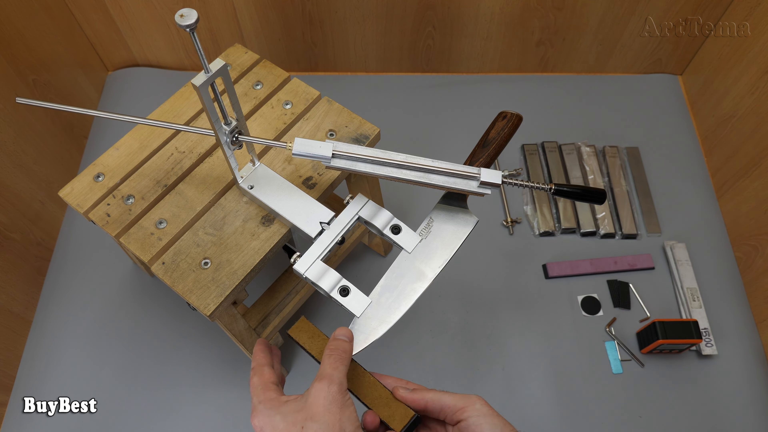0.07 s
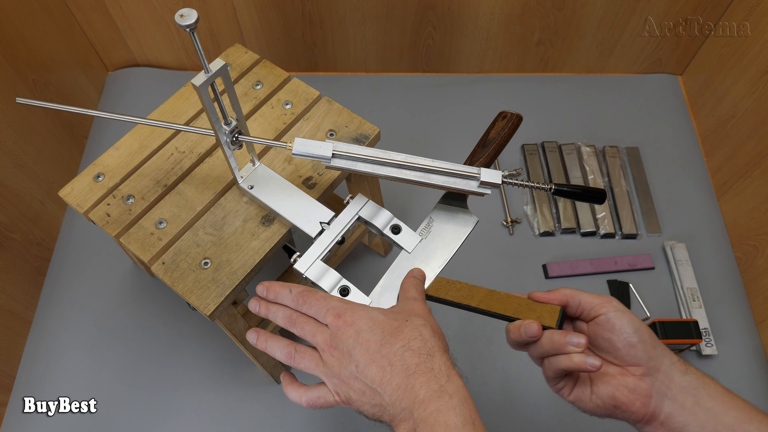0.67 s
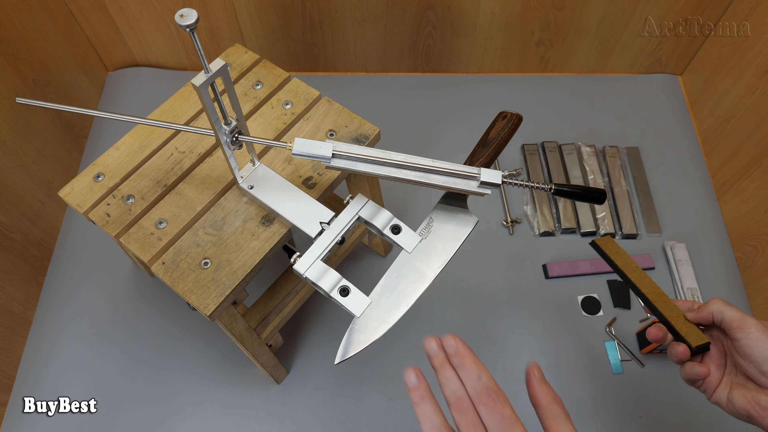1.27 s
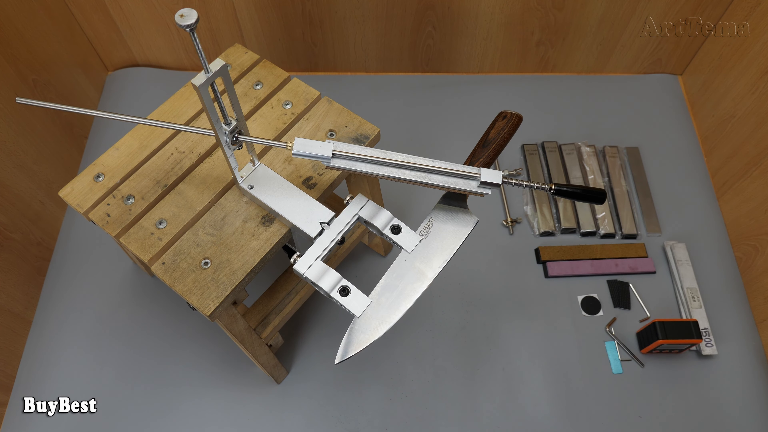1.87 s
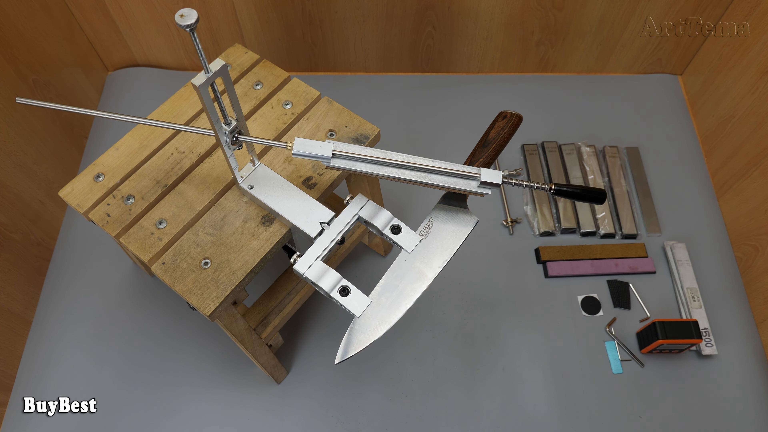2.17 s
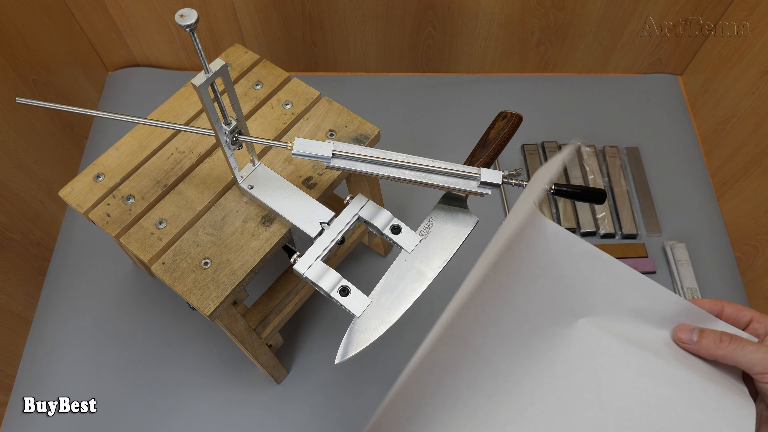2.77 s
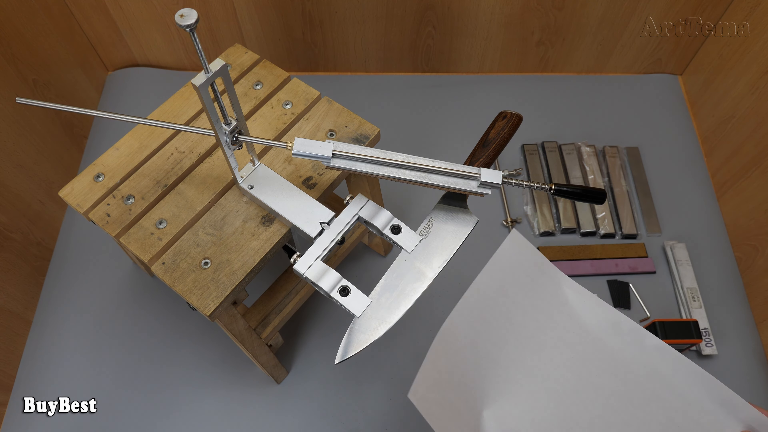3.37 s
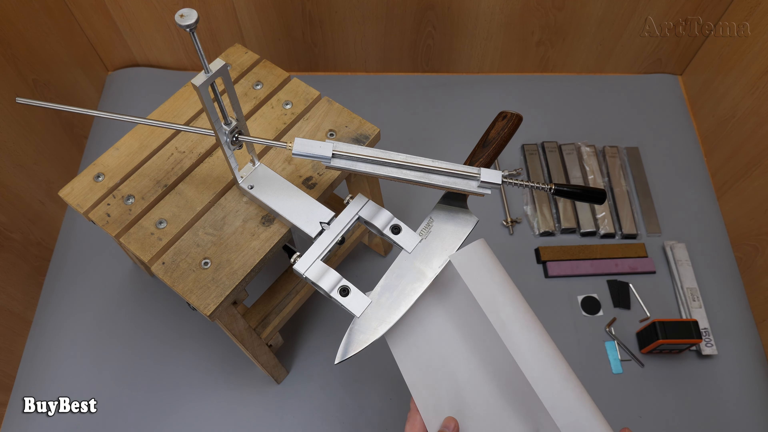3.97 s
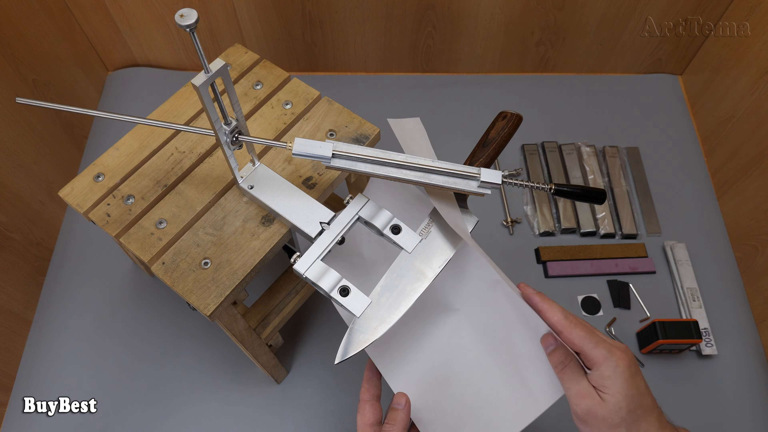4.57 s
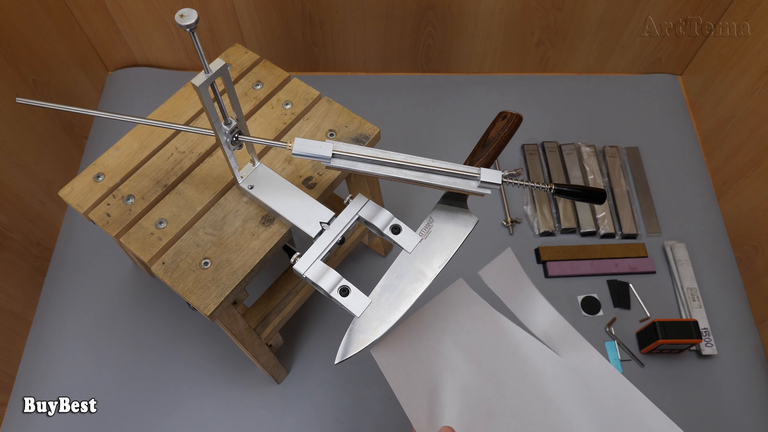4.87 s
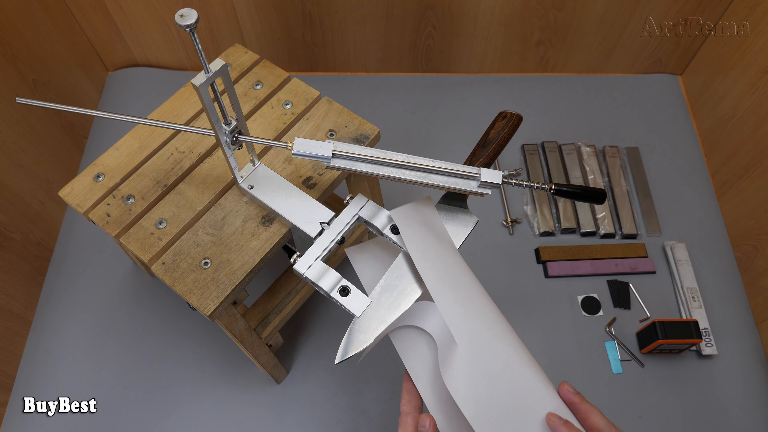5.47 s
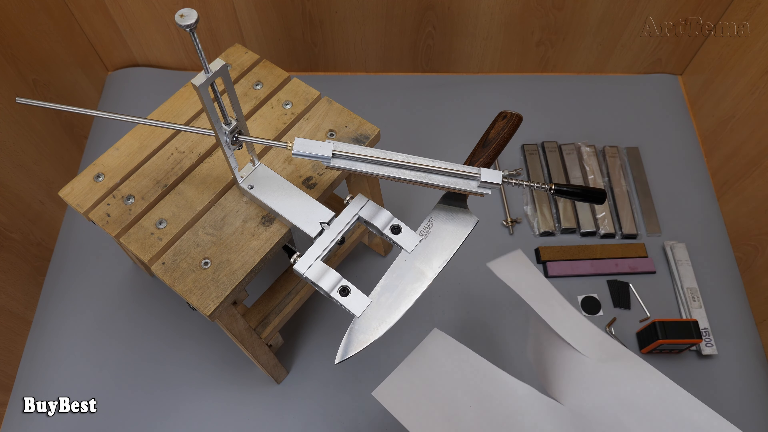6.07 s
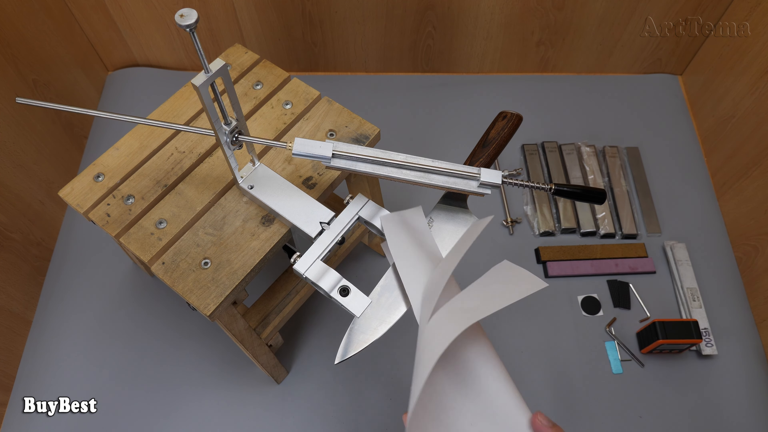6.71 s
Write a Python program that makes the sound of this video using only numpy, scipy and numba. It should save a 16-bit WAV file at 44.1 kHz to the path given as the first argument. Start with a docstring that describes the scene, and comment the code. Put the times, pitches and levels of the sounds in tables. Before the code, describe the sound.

From the start until about 1.3 seconds, a fine stone is flicked along a clamped knife nine times, slightly quickening. Each stroke is a soft, low thump through a wooden stool with a faint whisper of grit. At about 1.5 seconds the stone is put down with a sharp clack and briefly settles. From 2 seconds a sheet of paper rustles, slides and pops as it bends, with the sharpest crackles near 3 seconds. At about 4.1 seconds the blade slices the paper for half a second, a crisp, fizzing rasp with a slight steel ring and soft low bumps. More rustling leads to a shorter cut at 5.4 seconds, with a tiny squeak as the edge catches. The sheet crinkles again, and a third, brighter cut runs from 6.6 to 6.9 seconds. Everything is close, in a small, quiet room with faint low background noise.

```python
"""Soft thumps and a whisper of grit come first: a fine stone is flicked along a knife clamped in a
sharpening jig on a wooden stool. The stone clacks down on the table. A sheet of paper is picked up,
rustles and pops as it bends, and is drawn three times through the edge. Each cut is a stream of
snapping fibres that rings the sheet and the blade. It all happens close by, in a small, quiet room."""
import sys
import numpy as np
from scipy import signal
from scipy.fft import rfft, irfft
from scipy.io import wavfile
from numba import njit

SR = 44100
rng = np.random.default_rng(int(sys.argv[2]) if len(sys.argv) > 2 else 0)


def wav_record(signal):
    """Record a signal, one row per channel, as 16-bit PCM in the file named by sys.argv[1]."""
    frames = np.transpose(np.atleast_2d(signal))
    bounded = np.clip(frames, -1, 1)
    # unit amplitude maps onto the largest positive 16-bit level
    quanta = np.round(bounded * 32767).astype(np.int16)
    wavfile.write(sys.argv[1], SR, quanta)


N = 297231
T = np.arange(N) / SR

# Levels in the tables are relative: the functions add each layer's own gain.
# cuts: t/s, length/s, time to bite fully/s, time taut/s, sheet/dB, flap/dB, fizz/dB, slack flap f/Hz
CUTS = [(4.138, .49, 0.1, .09, -36.5, -30, -32, 4600), (5.385, 0.34, 0.041, .04, -36, -28, -30.5, 4700),
        (6.629, .3, 0.038, .04, -37, -22.5, -25.5, 4970)]
# the edge catches the paper and a note sings: t/s, length/s, f/Hz, level/dB
CATCHES = [(4.262, 0.2, 2920, -41), (5.417, 0.12, 1916, -43), (5.428, 0.07, 1948, -36.5),
           (6.627, 0.052, 1580, -36.5)]
# low thumps: a puff of air from the flapping sheet, then the cuts tugging the blade: t/s, level/dB
LOW_THUMPS = [(3.013, -47), (4.387, -42), (4.465, -43), (4.592, -43.5), (5.698, -42)]
# the stone meets the blade and slides off: t/s, thump level/dB, slide length/s, slide level/dB
STROKES = [ (0.0, -38, 0.042, -83), (0.157, -36.5, .1, -75.5), (0.339, -31, 0.077, -74),
           (0.505, -35, .07, -73), (0.667, -34.5, .055, -73), (0.816, -35.5, 0.047, -71),
           (0.963, -39, 0.047, -69.5), (1.091, -29.5, .06, -70.5), (1.221, -40, .033, -67)]
# the stone is put down and rocks to rest: t/s, length/s, knock/dB, click/dB, table thud/dB
CLACKS = [(1.394, 0.0016, -81, -59.5, -81), (1.452, 0.0038, -40, -53, -42), (1.483, 0.007, -59, -61, -40),
          (1.5293, 0.0043, -27.5, -27, -30), (1.569, 0.0055, -51, -68, -48.5),
          (1.575, 0.0064, -57, -59.5, -45.5), (1.621, 0.015, -59, -62, -71)]
# a patch of the sheet pops over: t/s, length/s, level/dB, f/Hz
BUCKLES = [(2.165, 0.015, -42, 2950), (2.224, 0.019, -44, 2430), (2.437, 0.039, -48, 1030),
           (2.504, 0.01, -41, 2900), (2.679, 0.017, -49, 1750), (2.701, 0.0042, -45, 2830),
           (2.744, 0.0045, -65, 3700), (2.762, 0.0075, -69.5, 3730), (2.806, 0.0067, -60, 1500),
           (2.994, 0.012, -36.5, 2150), (3.017, 0.0074, -34.5, 2200), (3.031, 0.0067, -32.5, 3020),
           (3.039, 0.012, -33.5, 2470), (3.205, 0.0045, -44.5, 1580), (3.271, 0.0027, -41.5, 2640),
           (3.399, 0.0027, -50.5, 1390), (3.568, 0.017, -47.5, 1790), (3.805, 0.0096, -50.5, 2700),
           (3.884, 0.016, -58, 1390), (3.973, 0.0059, -55.5, 1440), (4.066, 0.0055, -54, 1470),
           (4.78, 0.019, -41, 2640), (4.869, 0.0057, -45.5, 1720), (5.136, 0.0068, -44, 1530),
           (5.256, 0.0033, -47.5, 970), (5.306, 0.0096, -52.5, 1240), (5.819, 0.0034, -44, 2000),
           (5.931, 0.0086, -40, 2100), (5.949, 0.0075, -33.5, 2530), (6.108, 0.0076, -46.5, 1590),
           (6.292, 0.014, -49.5, 2100)]
# four moves of the sheet in the hands: t/s, flexing level/dB, sliding level/dB
PICK_UP = [(1.94, -74.5, -71), (1.98, -64, -56), (2.03, -79, -60.5), (2.11, -60, -55.5),
           (2.205, -59.5, -56), (2.3, -54.5, -53), (2.48, -65.5, -52.5), (2.65, -71, -60), (2.84, -84, -80)]
TO_THE_EDGE = [(2.902, -65.5, -57), (2.975, -60.5, -84), (3.12, -56.5, -60), (3.25, -63, -54.5),
               (3.31, -69.5, -58.5), (3.45, -62, -54), (3.66, -58.5, -59.5), (3.8, -61, -56.5),
               (3.85, -82, -66), (3.985, -80, -63.5), (4.02, -82.5, -74), (4.12, -64.5, -80)]
DRAW_BACK = [(4.63, -56, -50.5), (4.75, -61, -49.5), (4.845, -55, -51.5), (4.95, -54.5, -48.5),
             (5.02, -64.5, -60.5), (5.09, -67.5, -52.5), (5.2, -72, -67.5), (5.372, -68.5, -60.5)]
TURN_OVER = [(5.729, -48, -51.5), (5.8, -64, -43), (5.91, -58.5, -50.5), (6.0, -52.5, -48.5),
             (6.07, -61.5, -54), (6.18, -62.5, -59.5), (6.3, -59.5, -53.5), (6.4, -70, -61.5),
             (6.612, -67.5, -53)]
# one part of the sheet swishes over another: t/s, length/s, level/dB
SWISHES = [(2.374, 0.093, -50.5), (3.409, 0.03, -48.5), (3.678, 0.058, -57), (5.798, 0.082, -48.5)]
# the notes the clamped blade rings at: f/Hz, level/dB
BLADE_NOTES = [(1861, 11), (1982, 1), (2946, -6), (3086, 4), (3337, -1), (3469, -22), (4118, -5), (4404, 1),
               (4684, -40), (4760, 8), (5264, 6), (6763, -1), (7430, -6), (8400, 8), (9550, 2)]
# the notes stool and table ring at: f/Hz, level/dB, time to fade by 60 dB/s
WOOD_NOTES = [(77.6, -17.5, 0.51), (112, -18.5, 0.3), (141, -15.5, 0.083)]
# tone colours, from bass to treble: f/Hz, level/dB
SHEET_TONE = [(30, -75), (70, -5), (115, -11.5), (190, -16.5), (420, -13), (700, -6.5), (1100, -1.5),
              (1750, 0), (2200, -3), (2800, -11.5), (5000, -27), (16000, -22)]  # the sheet shaken by a cut
FIBRE_TONE = [(100, -51), (2000, -7), (4500, -8), (5600, -3.5), (7200, -3), (8600, -0.5), (10000, -6),
              (11400, -14), (12600, -13.5), (16000, -28.5)]  # fibres snapping
GRIT_TONE = [(100, -3), (500, 14), (1100, 3.5), (1850, 1.5), (2450, -2.5), (4500, 0.5), (6800, 3.5),
             (8500, 7.5), (10800, 3.5), (12200, -3), (16000, -11)]  # stone rubbing steel
KNOCK_TONE = [(60, -27.5), (220, 3), (350, 5), (460, -7), (620, -1.5), (1000, -12.5), (1400, -15.5),
              (2200, -26.5), (4000, -44.5), (16000, -51)]  # knocked wood
CLACK_LOW_TONE = [(60, -7.5), (250, 1), (450, -4), (850, 3), (1300, 3), (2200, -2), (3500, -31),
                  (7000, -21), (16000, -49)]  # the stone's dull knock
CLACK_HIGH_TONE = [(100, -43), (1500, 2), (3200, 5.5), (5500, 2), (7000, -3), (9000, -7), (12000, -28.5),
                   (16000, -37)]  # the stone's bright click
FLEX_TONE = [(30, -8.5), (100, -1), (200, -1.5), (500, 0), (900, -1.5), (1500, 0.5), (2200, -6),
             (3100, -15), (6000, -22.5), (16000, -36)]  # paper bending
SLIDE_TONE = [(100, -10), (1500, -11), (3200, -2), (4900, 0.5), (6500, -5.5), (9000, -4.5), (11500, -15.5),
              (16000, -27)]  # paper rubbing paper
ROOM_TONE = [(20, -9), (119, -5.5), (238, -16), (534, -21), (900, -32), (1900, -35), (10500, -35),
             (15500, -38)]  # the room's low background noise
# early echoes from table, jig and corner walls: delay t/s, level/dB
ECHOES = [(.003, -30), (.0047, -28), (.0066, -30.5), (.0089, -24.5)]

ENTRY_DB, ENTRY_S, EXIT_S = -9.5, 0.0042, 0.063  # the edge enters lightly and runs out gradually
# after the bite the cut flap pulls taut, then eases to a share of its full tension
TAUT_AFTER_S, TAUT_RISE_S, EASED_SHARE = 0.095, 0.056, 0.61
# a slack flap is quieter; a taut one rings louder and lower, and the fizz gives way
SLACK_FLAP_DB, SLACK_SHEET_DB, TAUT_FIZZ_DB, TAUT_DROP_OCTAVES = -18.5, -4, -6.5, 0.26
STOOL_HZ, SLIDE_DELAY_S = 87.8, 0.012
KNOCK_DB, KNOCK_GROWTH = 45.5, 3.03  # knocks grow faster than thumps, so only firm strokes knock
PATCH_Q = 0.82  # a popping patch's pitch divided by the width of its band
CRISP_HZ, CRISP_DB, CRISP_DB_PER_OCTAVE = 2930, -3, 49
ROOM_TONE_DB, TOP_HZ = -66.5, 15750


def slicing():
    """Fibres snap on the edge and shake the sheet, the blade and the flap, which rings as it tightens."""
    sheet_gain, flap_gain, fizz_gain, flap_hz = 0, 0, 0, CUTS[0][-1]
    for start, length, bite_s, taut_s, sheet_db, flap_db, fizz_db, slack_hz in CUTS:
        pressure, tension = cut_shape(start, length, bite_s, taut_s)
        sheet_gain += pressure * undb(sheet_db + SLACK_SHEET_DB * (1 - tension))
        flap_gain += pressure * undb(flap_db + SLACK_FLAP_DB * (1 - tension))
        fizz_gain += pressure * undb(fizz_db + TAUT_FIZZ_DB * tension)
        flap_hz = np.where(T >= start, slack_hz * 2 ** (-TAUT_DROP_OCTAVES * tension), flap_hz)
    fibres = snaps(rate=5000, spread_db=1.5) * flutter(rate=350, depth_db=1.1)
    flap_hz = flap_hz * flutter(rate=40, depth_db=0.5)  # the tension wavers
    # the sheet's many overlapping bending waves blur the single snaps
    sheet = colour(snaps(rate=7300, spread_db=-2), SHEET_TONE)
    flap = band(fibres, flap_hz, width_hz=3100) * flutter(rate=40, depth_db=1)
    fizz = colour(fibres, FIBRE_TONE) * flutter(rate=40, depth_db=1)
    rasp = sheet_gain * sheet + undb(0.5) * flap_gain * flap + fizz_gain * fizz
    rasp *= flutter(rate=49, depth_db=1.5)  # the sheet feeds unevenly
    steel = undb(-7) * sheet_gain * ring(fibres, BLADE_NOTES, width_hz=17)
    low_thumps = sum(undb(db) * thump(start, hz=109.5, rise_s=0.011) for start, db in LOW_THUMPS)
    return sheet_echo(rasp, lag_s=0.0005, db=-13) + steel + low_thumps


def cut_shape(start, length, bite_s, taut_s):
    """How hard the edge presses and how taut the flap is through one cut, both from 0 to 1."""
    t = T - start
    gate = np.clip(t / ENTRY_S, 0, 1) * np.clip((length - t) / EXIT_S, 0, 1)
    pressure = gate * undb(ENTRY_DB * np.clip(1 - t / bite_s, 0, 1))
    since_taut = t - bite_s - TAUT_AFTER_S
    tightening = np.exp(-(since_taut / TAUT_RISE_S) ** 2)
    easing = EASED_SHARE + (1 - EASED_SHARE) * np.exp(-(since_taut / taut_s) ** 4)
    return pressure, np.where(since_taut < 0, tightening, easing)


def singing():
    """Where the edge catches, the snapping fibres keep a single note ringing."""
    fibres = noise()
    return sum(undb(db) * swell(start, length) * ring(fibres, [(hz, 0)], width_hz=39)
               for start, length, hz, db in CATCHES)


def sharpening():
    """Each flick bumps the jig, then the grit whispers along the edge and makes the stool hum."""
    thumps, knock_gain, pressure = 0, 0, 0
    for start, thump_db, slide_s, slide_db in STROKES:
        thumps += undb(thump_db + 2.5) * thump(start, STOOL_HZ, rise_s=0.0095)
        contact = burst(start + 0.0012, length=0.0065, attack=0.7, decay=0.91)
        knock_gain += undb(KNOCK_DB + KNOCK_GROWTH * thump_db) * contact
        pressure += undb(slide_db) * swell(start + SLIDE_DELAY_S, slide_s)
    grit = colour(snaps(rate=3600, spread_db=1.5), GRIT_TONE)
    steel = ring(grit, BLADE_NOTES, width_hz=110)
    stool_hum = band(noise(), hz=98, width_hz=60)
    scrape = undb(4) * grit + undb(-2) * steel + undb(20.5) * stool_hum
    return thumps + knock_gain * colour(noise(), KNOCK_TONE) + pressure * scrape


def stone_down():
    """The stone meets the padded table, clacks against its neighbour and settles; the table thuds."""
    knock = colour(snaps(rate=12000, spread_db=-1.5), CLACK_LOW_TONE)
    click = colour(snaps(rate=12000, spread_db=-2), CLACK_HIGH_TONE)
    wood = colour(noise(), KNOCK_TONE)
    out = np.zeros(N)
    for start, length, knock_db, click_db, thud_db in CLACKS:
        contact = burst(start, length, attack=1, decay=0.52) ** 2  # rough faces meet gradually
        out += contact * (undb(knock_db + 5.5) * knock + undb(click_db + 6.5) * click)
        table_thump = undb(0.5) * thump(start + 0.0042, hz=117, rise_s=0.0092)
        table_knock = undb(-7.5) * burst(start, length=0.0088, attack=0.4, decay=1) * wood
        out += undb(thud_db) * (table_thump + table_knock)
    return out


def thump(start, hz, rise_s):
    """A soft push makes two or three low swings, then a faint wooden ring."""
    t = np.clip(T - start, 0, 1)
    swing = (t / rise_s * np.exp(1 - t / rise_s)) ** 2 * np.sin(2 * np.pi * hz * t)
    after_ring = sum(undb(db - 60 * t / fade_s) * np.sin(2 * np.pi * note_hz * t)
                     for note_hz, db, fade_s in WOOD_NOTES)
    return swing + np.tanh(t / rise_s) * after_ring


def buckling():
    """A patch of paper pops over and a cluster of snaps rings it; small ones are higher and crisper."""
    cluster = snaps(rate=9300, spread_db=6)
    flex = colour(noise(), FLEX_TONE)
    crack = colour(snaps(rate=12000, spread_db=6), SLIDE_TONE)
    out = np.zeros(N)
    for start, length, db, hz in BUCKLES:
        near = np.abs(T - start) < 0.25
        patch = band(cluster[near], hz, width_hz=hz / PATCH_Q)
        crispness = undb(CRISP_DB + CRISP_DB_PER_OCTAVE * np.log2(hz / CRISP_HZ))
        pop = undb(-2.5) * patch + undb(-6.5) * flex[near] + crispness * crack[near]
        out[near] += undb(db) * burst(start, length, attack=0.5, decay=0.8)[near] * pop
    return out


def handling():
    """The sheet flexes in the hands and slides over itself."""
    moves = PICK_UP, TO_THE_EDGE, DRAW_BACK, TURN_OVER
    flex_gain = sum(move_gain(move, column=1) for move in moves)
    slide_gain = sum(move_gain(move, column=2) for move in moves)
    slide_gain += sum(undb(db) * swell(start, length) for start, length, db in SWISHES)
    flexing = colour(snaps(rate=9000, spread_db=4.5), FLEX_TONE) * flutter(rate=80, depth_db=4)
    sliding = colour(snaps(rate=20000, spread_db=6.5), SLIDE_TONE) * flutter(rate=41, depth_db=4.5)
    return undb(3.76) * flex_gain * flexing + undb(-4.5) * slide_gain * sliding


def sheet_echo(x, lag_s, db):
    """Sound bounces off the moving sheet, so the echo's delay wanders and gently shifts the tone."""
    lag = lag_s * flutter(rate=7, depth_db=2.5)
    echo = undb(db) * np.interp(T - lag, T, x)
    return (x + echo) / np.sqrt(1 + undb(db) ** 2)


def room(x, tail_db, fade_s, dull_hz):
    """Close surfaces throw back separate echoes, then a short, slightly dull tail."""
    t = T[:SR // 2]
    tail = rng.standard_normal(len(t)) * undb(-60 * t / fade_s) * (t > 0.008)
    tail = signal.sosfilt(signal.butter(1, dull_hz, fs=SR, output="sos"), tail)
    echoes = undb(tail_db) * tail / np.sqrt(np.sum(tail ** 2))
    for delay_s, db in ECHOES:
        echoes[int(delay_s * SR)] += undb(db)
    # thin panels let the bass through instead of throwing it back
    echoes = signal.sosfilt(signal.butter(1, 300, "high", fs=SR, output="sos"), echoes)
    return x + signal.fftconvolve(x, echoes)[:N]


def room_tone():
    """A faint, steady, low noise fills the room."""
    return undb(ROOM_TONE_DB) * colour(noise(), ROOM_TONE)


def undb(db):
    """Turn decibels into a gain, a number to multiply a sound by."""
    return 10 ** (np.asarray(db) / 20)


def unit(x):
    """Scale a sound to an average strength (rms) of 1."""
    return x / np.sqrt(np.mean(x ** 2))


def noise():
    """An even hiss: white noise."""
    return rng.standard_normal(N)


def snaps(rate, spread_db):
    """Tiny clicks of random size, about rate of them a second."""
    size = undb(spread_db * np.minimum(noise(), 2.5))
    happens = rng.random(N) < rate / SR
    return unit(happens * size * np.sign(noise()))


def flutter(rate, depth_db):
    """A factor that wanders at random around 1, taking rate steps a second."""
    steps = rng.standard_normal(N // 20)
    return undb(depth_db * np.interp(T * rate, np.arange(len(steps)), steps))


def burst(start, length, attack, decay):
    """The loudness of a short contact: a quick rise, then a fade, both stretched by its length."""
    progress = np.clip((T - start) / length, 0, 60)
    return np.tanh(progress / attack) * np.exp(-decay * (progress - 1))


def swell(start, length):
    """The loudness of a push that builds and eases off."""
    progress = np.clip((T - start) / length, 0, 1)
    return np.abs(np.sin(np.pi * progress)) ** 0.5


def move_gain(move, column, fade_s=0.039):
    """Follow one level column of a move, fading in before it and out after it."""
    rows = np.array(move)
    times, levels_db = rows[:, 0], rows[:, column]
    gate = np.clip(np.minimum(T - times[0], times[-1] - T) / fade_s + 1, 0, 1)
    return gate * undb(np.interp(T, times, levels_db))


def colour(x, tone):
    """Give a sound the tone colour in a table, at a strength of 1."""
    size = 8192
    hz, db = np.transpose(tone)
    freqs = np.maximum(np.arange(size // 2 + 1) * SR / size, 1)
    gains = undb(np.interp(np.log(freqs), np.log(hz), db))
    # this folding makes the filter ring only after a click, never before it
    cepstrum = irfft(np.log(gains))
    cepstrum[1:size // 2] *= 2
    cepstrum[size // 2 + 1:] = 0
    response = irfft(np.exp(rfft(cepstrum)))
    return unit(signal.fftconvolve(x, response)[:N])


@njit
def resonate(x, hz, width_hz):
    """Let through the sound near a pitch that may move (a state-variable band-pass filter)."""
    out, band_state, low_state = np.empty(len(x)), 0., 0.
    for i in range(len(x)):
        tuning = np.tan(np.pi * hz[i] / SR)
        damping = width_hz / hz[i]
        swing = (band_state + tuning * (x[i] - low_state)) / (1 + tuning * (tuning + damping))
        band_state = 2 * swing - band_state
        low_state += 2 * tuning * swing
        out[i] = damping * swing
    return out


def band(x, hz, width_hz):
    """Resonate twice, so less sound is left far from the pitch; the strength is 1."""
    centre, width = hz * np.ones(len(x)), float(width_hz)
    return unit(resonate(resonate(x, centre, width), centre, width))


def ring(drive, notes, width_hz):
    """A sound keeps a set of notes ringing, at a strength of 1; narrower notes ring longer."""
    return unit(sum(undb(db) * resonate(drive, np.full(N, float(hz)), float(width_hz))
                    for hz, db in notes))


def scene():
    """All the handwork in the quiet room, as one channel."""
    rustle = sheet_echo(handling() + buckling(), lag_s=0.000947, db=-14)
    work = sharpening() + stone_down() + rustle + slicing() + singing()
    return (room(work, tail_db=-26, fade_s=0.084, dull_hz=6870) + room_tone())[None]


def record(dry):
    """Cut away the highest treble, above TOP_HZ."""
    return signal.sosfilt(signal.ellip(10, 0.1, 80, TOP_HZ, fs=SR, output="sos"), dry)


dry = scene()
out = record(dry)
wav_record(out)
```